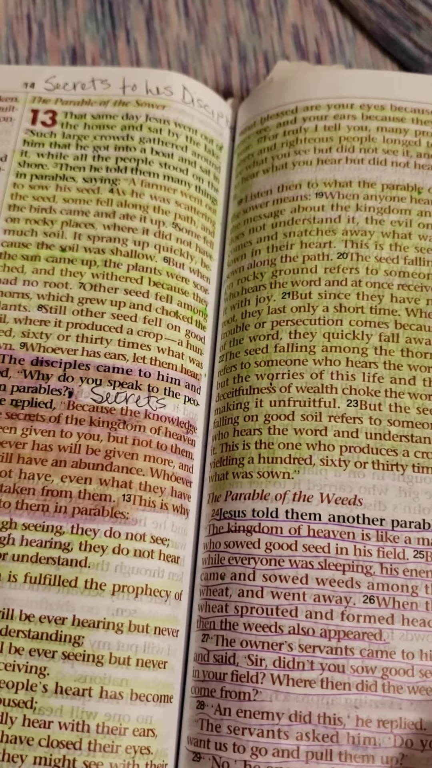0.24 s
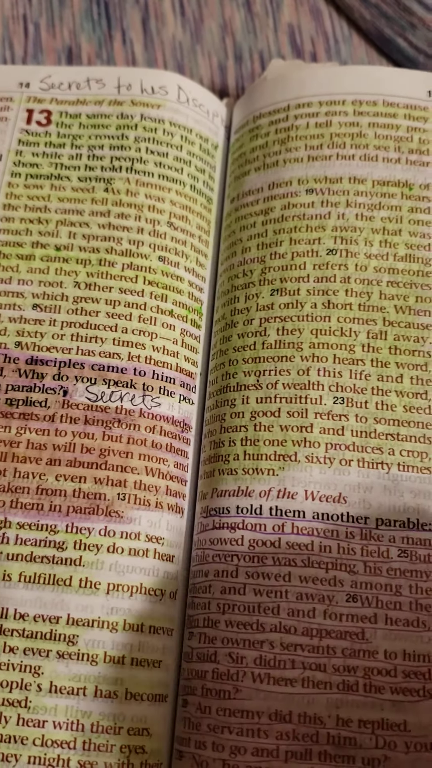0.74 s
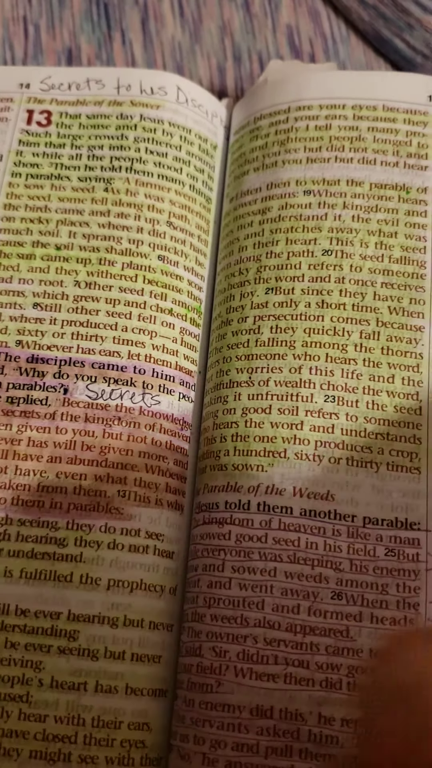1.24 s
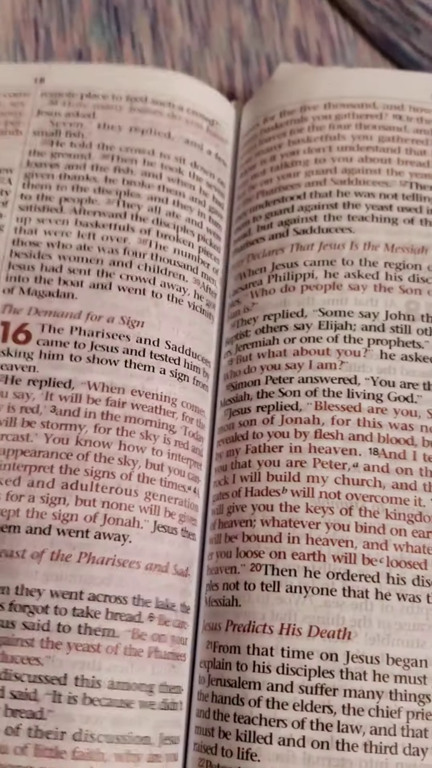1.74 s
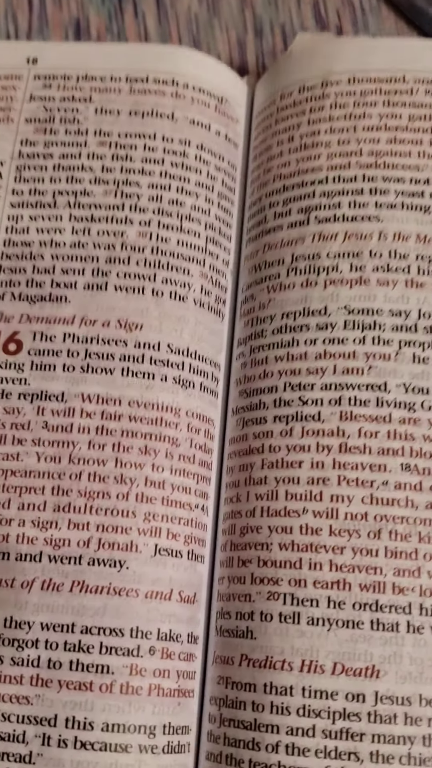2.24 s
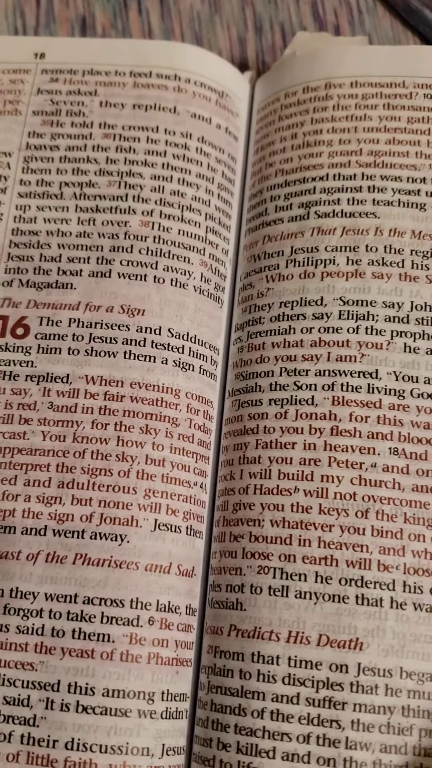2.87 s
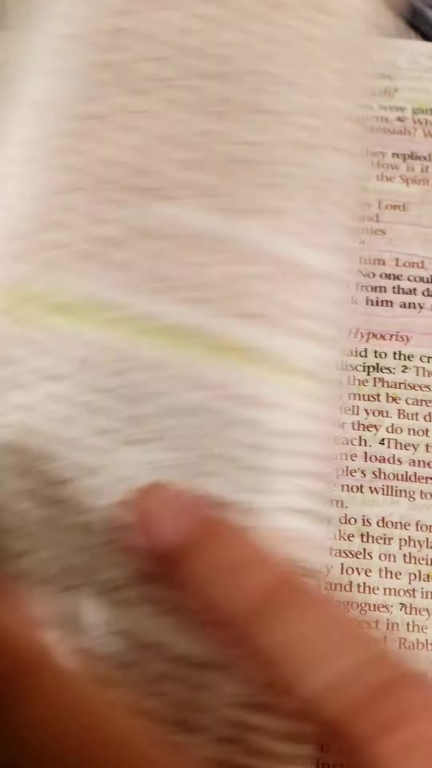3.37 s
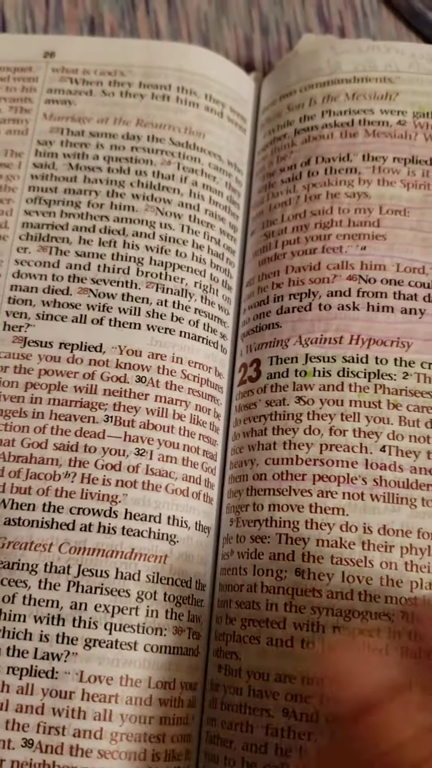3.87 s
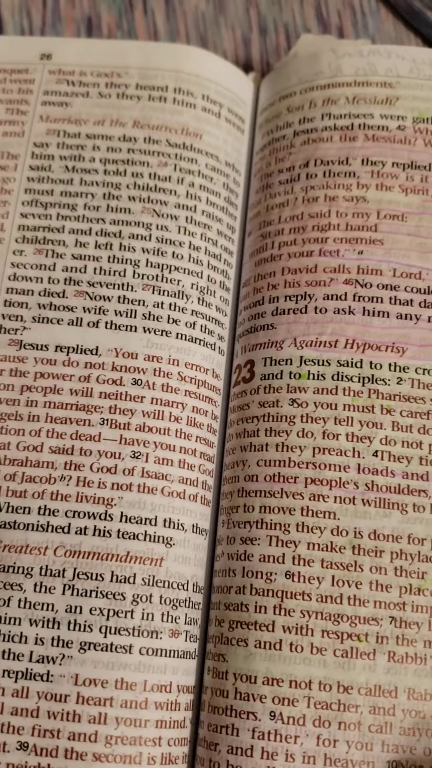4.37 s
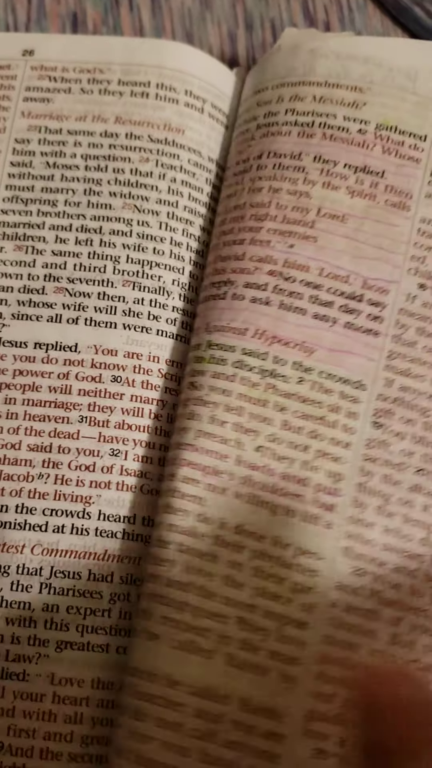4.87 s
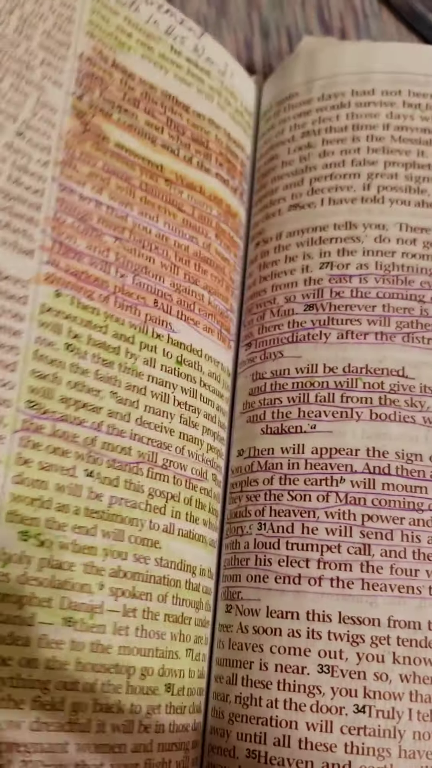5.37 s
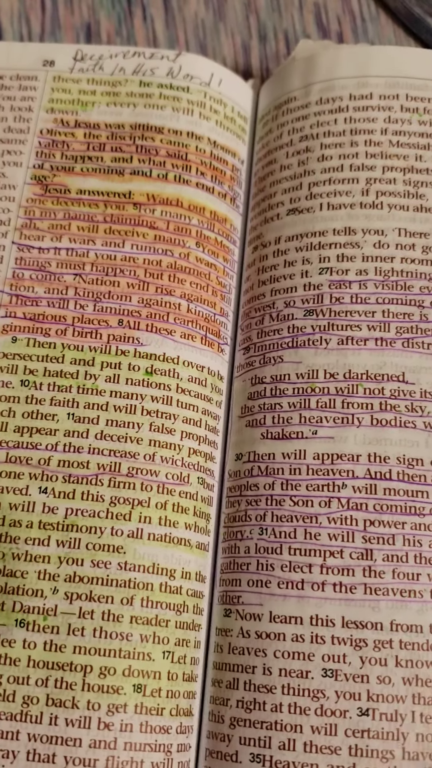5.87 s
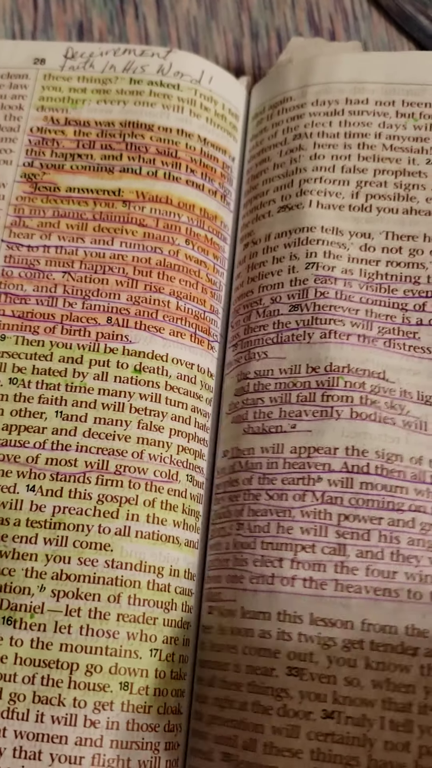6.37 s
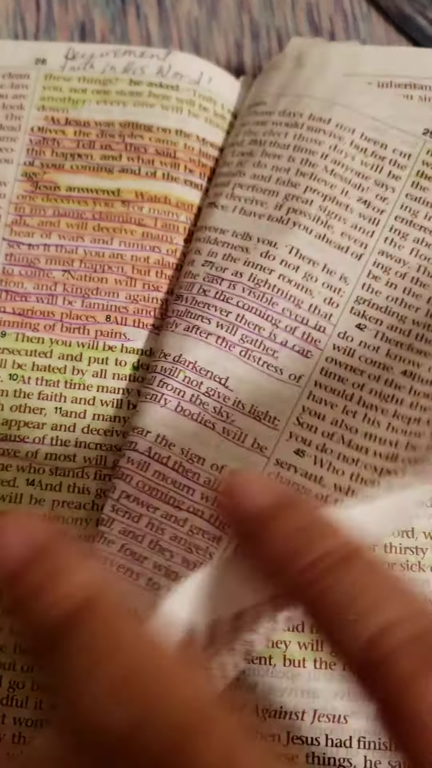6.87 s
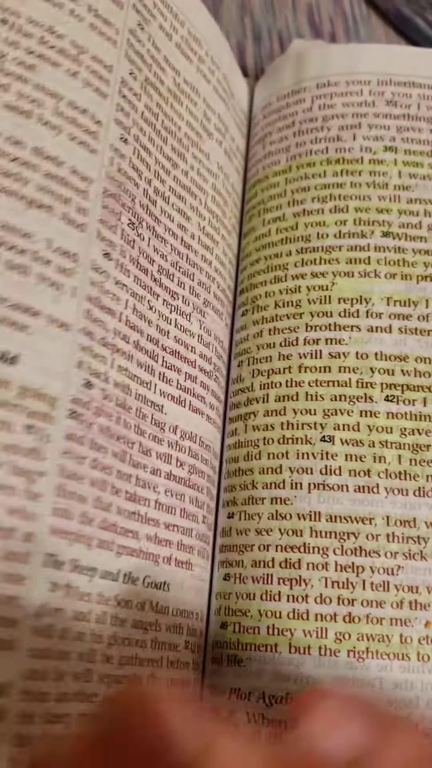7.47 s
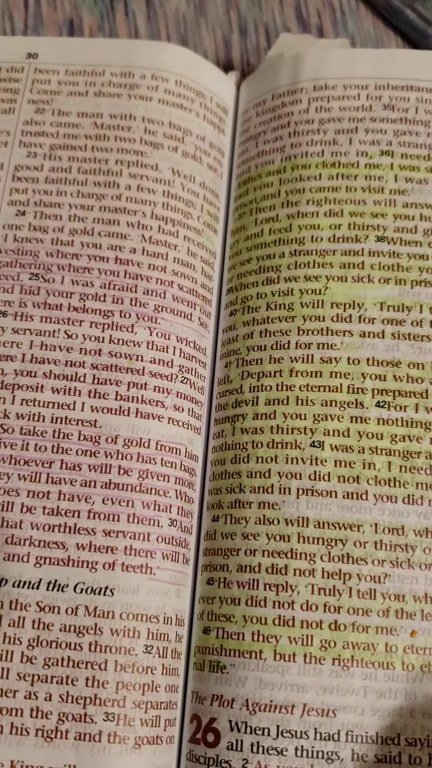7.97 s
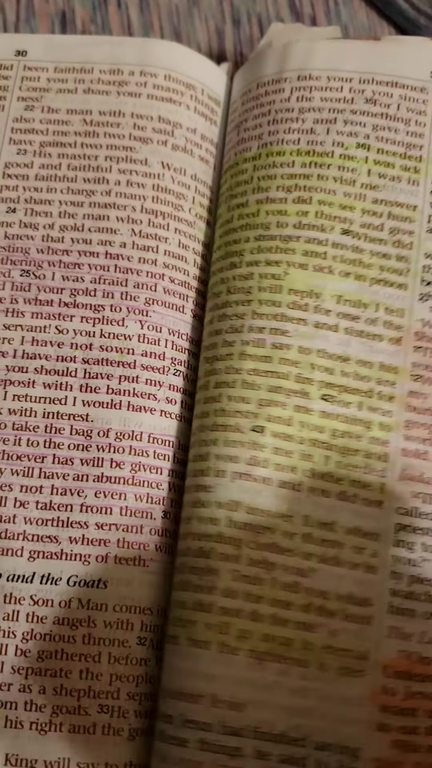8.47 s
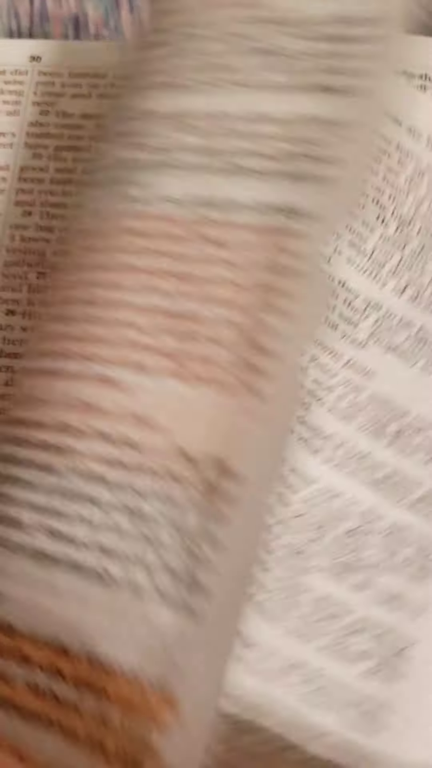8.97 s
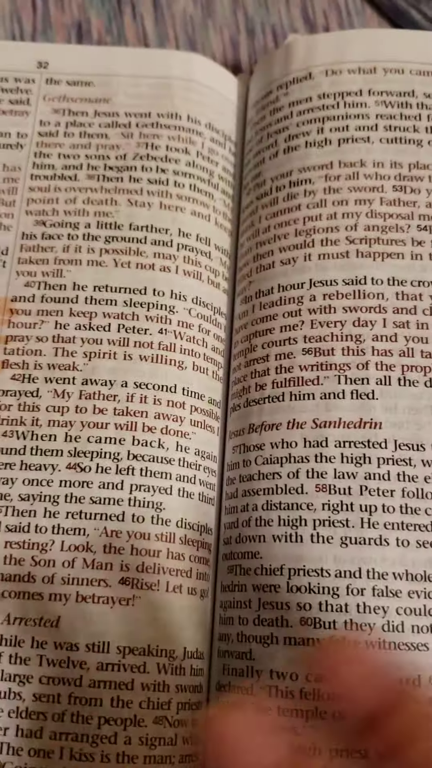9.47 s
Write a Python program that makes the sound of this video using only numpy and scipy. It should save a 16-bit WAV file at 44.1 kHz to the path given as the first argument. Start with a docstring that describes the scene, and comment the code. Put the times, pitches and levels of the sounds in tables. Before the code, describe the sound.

Five thin pages of a thick book are turned by hand, with dry swishes, sharp crinkles and quiet pauses over a faint low room rumble.

```python
"""A low ventilation rumble under thin hiss, a faint tick, then five thin pages of a thick book turned by hand.
Sliding: noise and tiny slips, split into flap, rubbing and edge hiss, each following the hand's moves.
Creases: millisecond noise cracks with a short shiver. Fingers: sparse soft ticks.
A short room tail follows the paper sounds; a phone close by limits the bandwidth."""
import sys
import numpy as np
from scipy import signal
from scipy.fft import rfft, irfft
from scipy.io import wavfile
from scipy.ndimage import uniform_filter1d, map_coordinates

SR = 44100
rng = np.random.default_rng(int(sys.argv[2]) if len(sys.argv) > 2 else 0)


def generate_wav(sig):
    """Save sig (samples, or channels by samples) to the path in sys.argv[1] as 16-bit PCM at SR."""
    pcm = np.round(np.clip(np.atleast_2d(sig).T, -1, 1) * 32767).astype(np.int16)
    wavfile.write(sys.argv[1], SR, pcm)


N = 429093
TIME_S = np.arange(N) / SR
FREQ_HZ = np.maximum(np.fft.rfftfreq(N, 1 / SR), 1)
SIDES = np.array([[1], [-1]])  # left, right
TOP_HZ = 16000

# stereo place of the sheet as the hand carries it: [t/s, left minus right/dB]
SHEET_PLACE = [(.7, 3), (1.2, -1.5), (1.65, 5), (2.9, -2.5), (3.1, -0.5), (3.55, 4.5), (4.3, 2), (4.8, 2.5),
               (5.25, 2), (6.3, 4.5), (6.8, 0.5), (7.2, 3.5), (8.3, 3.5), (8.75, -0.5), (9.2, 2.5)]


def sliding(flap_hz=1500, edge_hz=7000, flap_trim_db=-1, sway_db=2, catch_db=2.0, crackle_db=-2, size=512):
    """Paper slides on paper, catching unevenly; the whole sheet sounds low and smooth, its edge high and crackly."""
    friction = unit(stereo_noise(N, alike=0.3) + slips(rate_hz=600, spread_db=5, decay_s=0.0005))
    crackle = slips(rate_hz=75, spread_db=5, decay_s=0.0004)
    crackly = unit(friction + undb(crackle_db) * crackle)
    hz, t, smooth = signal.stft(friction, SR, nperseg=size)
    rough = signal.stft(crackly, SR, nperseg=size)[2]
    hz = np.maximum(hz, 1)

    # three bands, each coloured by the paper and scaled to rms 1 over frequency
    low = 1 / (1 + (hz / flap_hz) ** 6)
    high = 1 / (1 + (edge_hz / hz) ** 6)
    bands = (low, 1 - low - high, high)
    sheet, rub, edge = (unit(paper_gain(hz) * band)[:, :, None] for band in bands)

    flap, rubbing, hiss = handling(t)
    sound = smooth * sheet * flap * undb(flap_trim_db)
    sound = sound + rough * (rub * rubbing + edge * hiss)
    sound = sound * bending(hz, t, depth_db=2.5, per_octave=12, rate_hz=30)
    sound = signal.istft(sound, SR, nperseg=size)[1][:, :N]

    catching = undb(catch_db * walk(45))
    pan_db = np.interp(TIME_S, *np.transpose(SHEET_PLACE)) + sway_db * walk(9)
    return sound * catching * placed(pan_db)


# steady slides of a sheet over its neighbour:
# [start t/s, length/s, rubbing level/dB, flap re rubbing/dB before trim, edge hiss re rubbing/dB]
SHEET_SLIDES = [(0.525, 0.032, -61.5, -11, 5), (0.672, 0.14, -44, -12.5, -1),
                (0.881, 0.18, -43.5, -8, -3.5), (1.131, 0.053, -49.5, -9.0, 1.5),
                (1.342, 0.053, -55.5, -16.5, -1.5), (1.596, 0.085, -46, -4, -1.5),
                (2.849, 0.093, -55.5, -24, 9.5), (2.961, 0.19, -46.5, -10.5, 1.5),
                (3.375, 0.031, -46, -5.5, -5), (3.486, 0.087, -45, -2, 0.5),
                (4.168, 0.15, -64.5, -9.5, 8.5), (4.421, 0.13, -58.5, -11.5, 6.5),
                (4.571, 0.204, -48.5, -18.5, -2.5), (4.889, 0.14, -48.5, -10.5, -3),
                (5.18, 0.1, -43.0, -6.5, -0.5), (6.166, 0.11, -59.5, -15.5, 12.5),
                (6.268, 0.25, -43.5, -10.5, -1), (6.501, 0.18, -42.5, -10, -5),
                (6.805, 0.18, -48.5, -8.5, 2), (7.162, 0.031, -52.5, -17.5, 5),
                (7.816, 0.0079, -55.5, -8, 1), (8.203, 0.092, -45.5, -16.5, -1),
                (8.37, 0.022, -49.5, -9, -5), (8.488, 0.0058, -53, -10.5, 3),
                (8.579, 0.14, -56.5, -3.5, -0.5), (8.771, 0.19, -51.5, -7, -0.5),
                (8.976, 0.054, -41.5, -8, -5.0), (9.147, 0.086, -48.5, -10.5, -4.5)]
# short swishes as a sheet is tugged, whips over or lands:
# [t/s, attack/s, rubbing level/dB, flap re rubbing/dB before trim, edge hiss re rubbing/dB]
SHEET_SWISHES = [(0.705, 0.025, -38.5, -9, -1), (1.201, .006, -55, 5, -4), (1.305, 0.011, -32, -8, -5.5),
                 (1.522, 0.0038, -51, -10, -15), (1.666, 0.0026, -38.5, -5, -10),
                 (3.072, 0.015, -39, -9.5, 0), (3.627, 0.013, -39, -1.5, -18.5),
                 (4.562, 0.018, -40.5, -18, 5.5), (4.713, .003, -33.5, -16, -3),
                 (4.863, 0.0061, -32.5, -10.5, -5), (5.125, .002, -41, -21, -9),
                 (5.258, 0.0032, -36, -8, -26), (5.394, 0.002, -53.5, 2, -7),
                 (6.304, 0.017, -29.5, -15.5, 1), (6.749, 0.015, -31, -8.5, -3),
                 (6.777, 0.014, -22.5, -14, 4), (6.921, 0.0035, -36.5, -6, 1), (7.201, .008, -45.5, -7, -8),
                 (8.6, 0.0032, -38, -10, -9), (8.767, 0.011, -33, -7.5, 0)]


def handling(t, slide_attack_s=0.033, slide_release_s=0.037, swish_release_s=0.019):
    """Gains of flap, rubbing and edge hiss; slides and swishes add in power."""
    moves = []
    for start_s, length_s, *levels_db in SHEET_SLIDES:
        moves.append((stroke(t, start_s, length_s, slide_attack_s, slide_release_s), *levels_db))
    for start_s, attack_s, *levels_db in SHEET_SWISHES:
        moves.append((stroke(t, start_s, 0, attack_s, swish_release_s), *levels_db))
    power = 0
    for shape, rub_db, flap_db, hiss_db in moves:
        gains = undb([rub_db + flap_db, rub_db, rub_db + hiss_db])
        power = power + np.outer(gains, shape) ** 2
    return np.sqrt(power)


def stroke(t, start_s, length_s, attack_s, release_s):
    """Friction builds as the sheet gathers speed, holds, and dies as the sheet comes to rest."""
    before = np.maximum(start_s - t, 0)
    after = np.maximum(t - start_s - length_s, 0)
    return np.exp(-before / attack_s - after / release_s)


def bending(hz, t, depth_db, per_octave, rate_hz):
    """Sheet resonances come and go as its curve changes: a random gain over frequency and time."""
    octaves = np.log2(np.maximum(hz, 100) / 100)
    place = np.meshgrid(octaves * per_octave, t * rate_hz, indexing="ij")
    knots = rng.standard_normal((int(place[0].max()) + 2, int(place[1].max()) + 2))
    surface = unit(map_coordinates(knots, place, order=1))
    return unit(undb(depth_db * surface))


# crease snaps: [t/s, level/dB, brightness/dB per octave, left minus right/dB]
CREASE_SNAPS = [(0.1838, -49, 7, -11), (0.7037, -33, 16, -2), (0.735, -32, 1, -2), (0.7575, -27, 0.5, 2),
                (0.987, -28, 0, -1.5), (1.0388, -34, 1, -5), (1.0513, -24.5, -3.5, 1.5),
                (1.201, -35, -9, 5), (1.2763, -34, 3.5, -3), (1.666, -35, -4.5, 5), (1.693, -35.5, 1.5, 5),
                (1.755, -44, -1, 7), (2.303, -62.5, -2, 5), (2.4673, -40.5, 11.5, -4), (2.68, -62, -1, -2),
                (2.8678, -26, 10, -9), (2.9023, -31, 4, -14), (2.9096, -29.5, 3, -9),
                (2.9325, -28.5, 4.5, -21), (2.9606, -27.5, 1, -4), (2.9924, -23.5, 3.5, -9.5),
                (3.0758, -25.5, 2.5, -15), (3.5687, -38.5, -3, 11), (3.6084, -35.5, -3.5, 17),
                (4.5813, -32.5, 2, 5), (4.7496, -31.5, 15, 0), (4.826, -36.5, 1, 6), (5.019, -32.5, 8, 3),
                (5.0669, -36.5, 4.5, 1), (5.2597, -25, -0.5, 16), (5.9175, -38.5, 12.5, -10),
                (6.1515, -31, 13, -1), (6.243, -29.5, 5, 4), (6.2978, -31.5, 4.5, 7),
                (6.4891, -24.5, 0.5, 2), (6.6643, -26.5, -2, 9), (6.6865, -26.5, 2, 3),
                (6.7153, -25.5, -0.5, 1), (6.7827, -15.5, 11, -8), (6.9198, -18.5, 6.5, -3),
                (7.2014, -33.5, 4, 8), (7.333, -52.5, 2, 3), (7.422, -51, 3.5, 7), (7.796, -41, 2, 4),
                (7.8155, -36.5, 0.5, 12), (8.1353, -40.5, 7, -18), (8.3653, -38, 0.5, 10),
                (8.5645, -36.5, 3, 3)]


def creases(base_decay_s=0.0014, slackness=0.044, reach=0.07, shiver_s=0.012, shiver_db=-25, size=2048):
    """A crease buckles with a millisecond crack and leaves the sheet shivering."""
    out = np.zeros((2, N + size))
    t = np.arange(size) / SR
    hz = np.maximum(np.fft.rfftfreq(size, 1 / SR), 1)
    lead, span = size // 16, size // 10  # samples: room before the crack, level window
    typical_db = np.median(np.transpose(CREASE_SNAPS)[1])
    for start_s, level_db, tilt_db, pan_db in CREASE_SNAPS:
        # tight, bright creases are over sooner; strong ones run further across the sheet
        decay_s = base_decay_s * np.exp(reach * max(level_db - typical_db, 0) - slackness * tilt_db)
        crack = flicks(1, decay_s, alike=0.57, lag_s=0.00012, size=size)[:, 0]
        shiver = stereo_noise(size, alike=0.3) * np.exp(-t / shiver_s)
        crack = crack + undb(shiver_db) * shiver
        tilt = undb(tilt_db * np.log2(np.clip(hz, 700, 12000) / 2000))
        crack = irfft(rfft(np.roll(crack, lead, axis=1)) * paper_gain(hz) * tilt)
        crack = crack / np.sqrt(np.sum(crack ** 2, axis=1, keepdims=True) / span)
        start = int(start_s * SR) - lead
        out[:, start:start + size] += crack * undb(level_db) * placed(pan_db)
    return out[:, :N]


# fingers shifting on the open page: [start t/s, end t/s, level/dB]
FINGER_TOUCHES = [(2.285, 2.723, -77.5), (5.78, 6.046, -61.5), (7.547, 7.77, -69.5), (7.85, 8.15, -60.5),
                  (9.702, 9.74, -47.5)]


def fingers(soft_db_per_octave=-0.5, tick_spread_db=4):
    """Fingertips creep over the page in sparse, soft ticks."""
    ticks = slips(rate_hz=62, spread_db=tick_spread_db, decay_s=0.0019, size=512)
    ticks = ticks + undb(-5) * stereo_noise(N, alike=0.19)
    softness = undb(soft_db_per_octave * np.log2(np.maximum(FREQ_HZ / 1000, 1)))
    ticks = unit(irfft(rfft(ticks) * paper_gain(FREQ_HZ) * softness, N))
    touch = sum(undb(db) * ((TIME_S > start_s) & (TIME_S < end_s)) for start_s, end_s, db in FINGER_TOUCHES)
    return ticks * uniform_filter1d(touch, size=512)


def slips(rate_hz, spread_db, decay_s, size=160):
    """Tiny slips of uneven size at random times, each with its own ring; rms 1."""
    count = int(rate_hz * N / SR)
    places = rng.integers(0, N, (count, 1)) + np.arange(size)
    sizes = undb(spread_db * np.minimum(rng.standard_normal((count, 1)), 2))
    grains = sizes * flicks(count, decay_s, alike=0.7, lag_s=0.00014, size=size)
    return unit(np.array([np.bincount(places.ravel(), port.ravel(), N)[:N] for port in grains]))


def flicks(count, decay_s, alike, lag_s, size):
    """Spots of paper jump and shiver for a moment; one port hears each a little before the other."""
    lag = rng.normal(0, lag_s * SR, (count, 1))  # samples
    delay = np.maximum(SIDES[:, None] * lag, 0)
    age = np.maximum(np.arange(size) - delay, 0).astype(int)
    t = np.arange(size) / SR / decay_s
    bursts = stereo_noise((count, size), alike) * np.sqrt(t) * np.exp(-t)
    return np.take_along_axis(bursts, age, axis=2)


# colour of the paper: [f/Hz, relative level/dB]
PAPER_COLOUR = [(130, -17.5), (420, -8.5), (650, -14), (950, -9), (1300, -10), (1580, -8.5), (1950, 0.5),
                (2700, -1.5), (3600, -2.5), (5400, -5.5), (7100, -1.5), (8500, -6.5), (12500, -1),
                (15800, -9)]
# band balance of the two microphone ports: [f/Hz, left minus right/dB]
PORT_BALANCE = [(380, -6), (1250, 5), (2300, -1.5), (4400, 4.5), (8000, 4), (13000, -6)]


def paper_gain(hz):
    """The paper's colour as each port hears it, up to TOP_HZ."""
    return colour(PAPER_COLOUR, hz) * colour(PORT_BALANCE, hz) ** (SIDES / 2) * (hz < TOP_HZ)


def placed(pan_db):
    """Left and right gains of constant power."""
    gains = undb(SIDES * pan_db / 2)
    return gains / np.sqrt(np.mean(gains ** 2, axis=0))


def room(x, t60_s=0.25, wet_db=-15, dull_hz=7000):
    """Short, dull reverberation of a furnished room: decaying lowpassed noise as impulse response."""
    t = TIME_S[:SR // 2]
    decay = np.exp(-np.log(1000) * t / t60_s)
    onset = 1 - np.exp(-t / 0.0015)
    tail = rng.standard_normal((2, len(t))) * decay * onset
    tail = signal.lfilter(*signal.butter(1, dull_hz, fs=SR), tail)
    tail = tail / np.sqrt(np.sum(tail ** 2) / 2)
    return x + undb(wet_db) * signal.fftconvolve(x, tail, axes=1)[:, :N]


# ventilation rumble gathered in room modes: [f/Hz, width/Hz, level/dB]
RUMBLE_MODES = [(57, 16, -49), (80, 14, -58.5), (118.5, 12, -58.5), (147.7, 14, -60), (165, 11, -59.5)]
# colour of still air and microphone hiss: [f/Hz, relative density/dB]
AIR_COLOUR = [(180, 0), (380, -6), (600, -19), (1200, -27.5), (5500, -35), (8000, -27), (12500, -23),
              (16000, -26)]


def background(swell_db=1, air_db=-62, drift_db=2.0):
    """Ventilation rumbles nearly alike in both ports, under a thin, drifting hiss."""
    power = 0
    for mode_hz, width_hz, db in RUMBLE_MODES:
        resonance = undb(db) / (1 + ((FREQ_HZ - mode_hz) / width_hz) ** 2)
        power = power + resonance ** 2 / width_hz
    rumble = irfft(rfft(stereo_noise(N, alike=0.94)) * np.sqrt(power * SR / np.pi), N)
    rumble = rumble * undb(swell_db * walk(4.5))
    air = irfft(rfft(stereo_noise(N, alike=0.3)) * colour(AIR_COLOUR, FREQ_HZ), N)
    return rumble + undb(air_db + drift_db * walk(2.7)) * unit(air)


def undb(db):
    """Decibels to gain."""
    return 10 ** (np.asarray(db) / 20)


def unit(x):
    """Scale to rms 1."""
    return x / np.sqrt(np.mean(x ** 2))


def colour(points, hz):
    """Gain of a [f/Hz, level/dB] outline, interpolated over log frequency."""
    f_hz, db = np.transpose(points)
    return undb(np.interp(np.log(hz), np.log(f_hz), db))


def stereo_noise(size, alike):
    """Two white noises; alike is their shared fraction of power."""
    shared = rng.standard_normal(size)
    return np.sqrt(alike) * shared + np.sqrt(1 - alike) * rng.standard_normal((2,) + shared.shape)


def walk(rate_hz):
    """Random wandering, linear between knots; rms 1."""
    knots = rng.standard_normal(int(N / SR * rate_hz) + 2)
    return unit(np.interp(TIME_S * rate_hz, np.arange(len(knots)), knots))


def scene():
    """Paper sounds with room tail, over the background."""
    return room(sliding() + creases() + fingers()) + background()


def record(dry):
    """The phone thins the deepest bass and cuts the top."""
    thinned = signal.sosfilt(signal.butter(4, 36, "high", fs=SR, output="sos"), dry)
    return signal.sosfilt(signal.ellip(10, 0.2, 70, TOP_HZ, fs=SR, output="sos"), thinned)


dry = scene()
out = record(dry)
generate_wav(out)
```